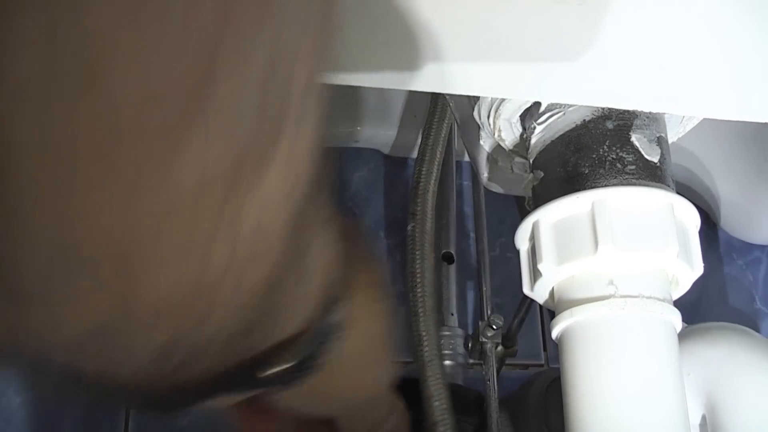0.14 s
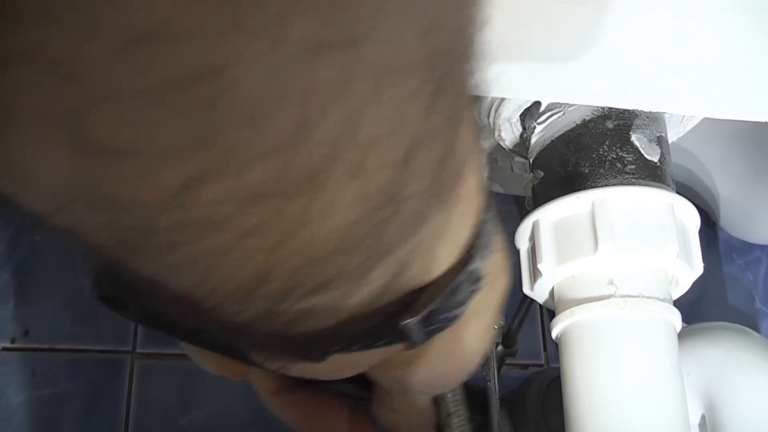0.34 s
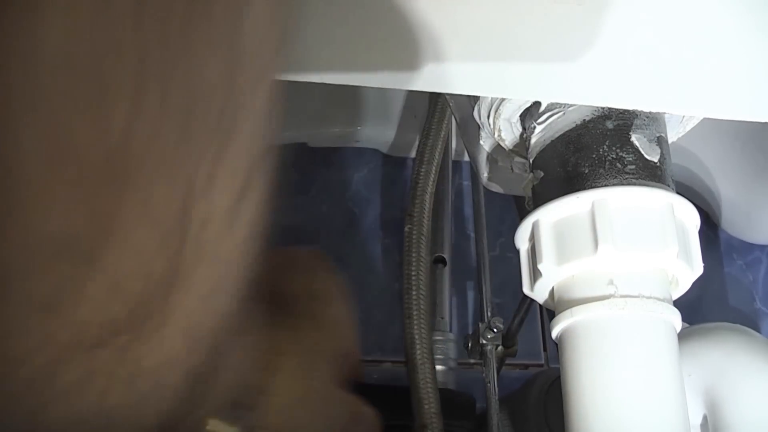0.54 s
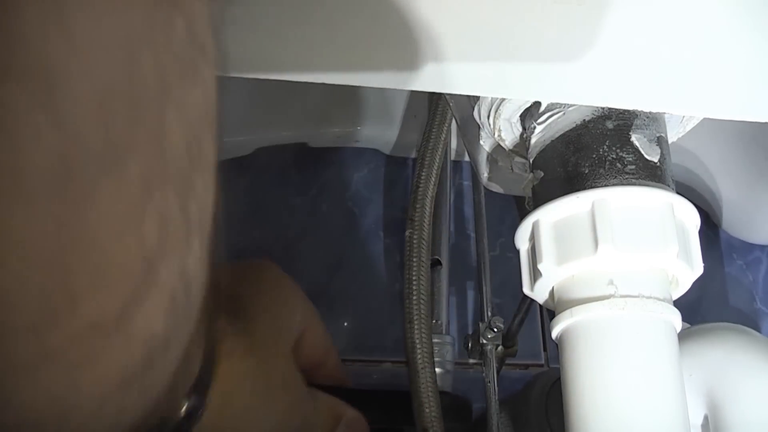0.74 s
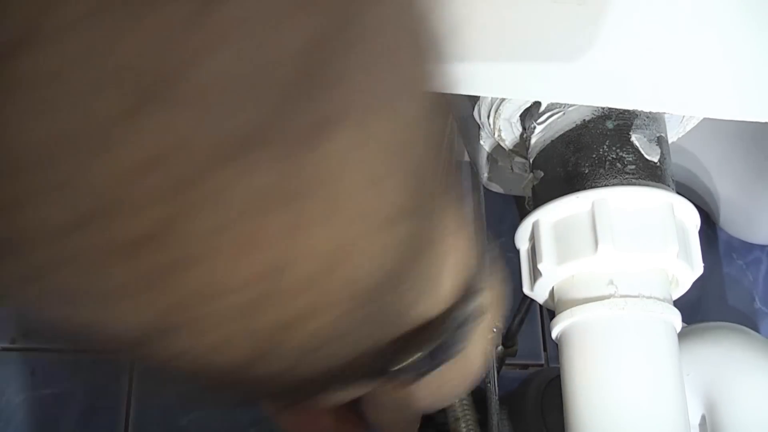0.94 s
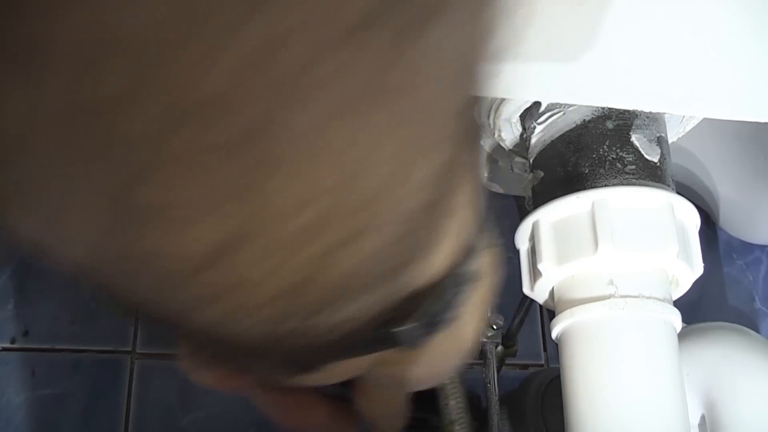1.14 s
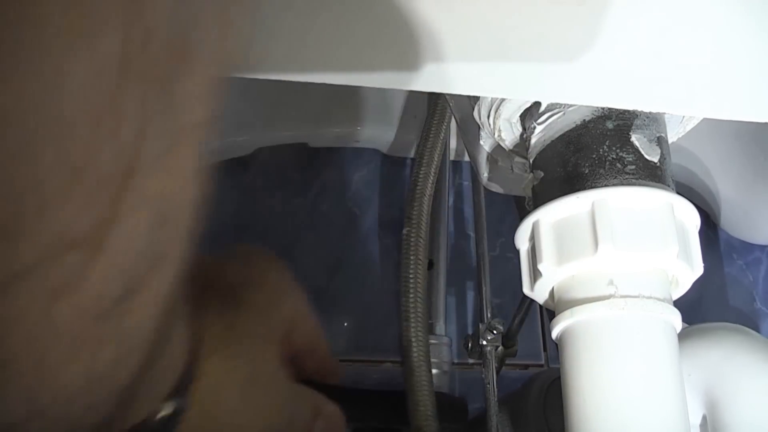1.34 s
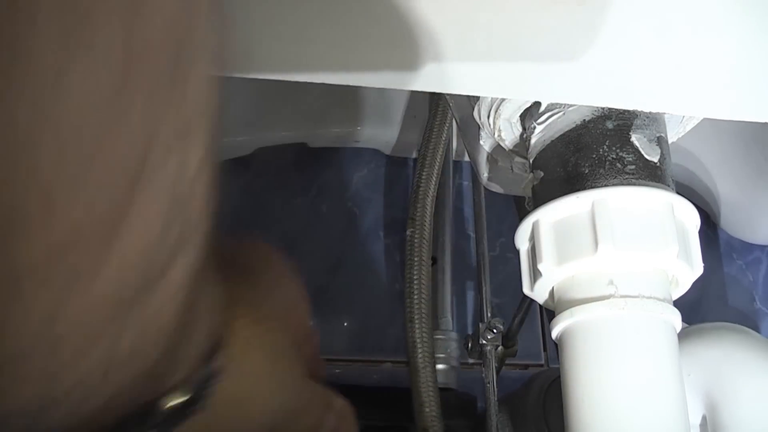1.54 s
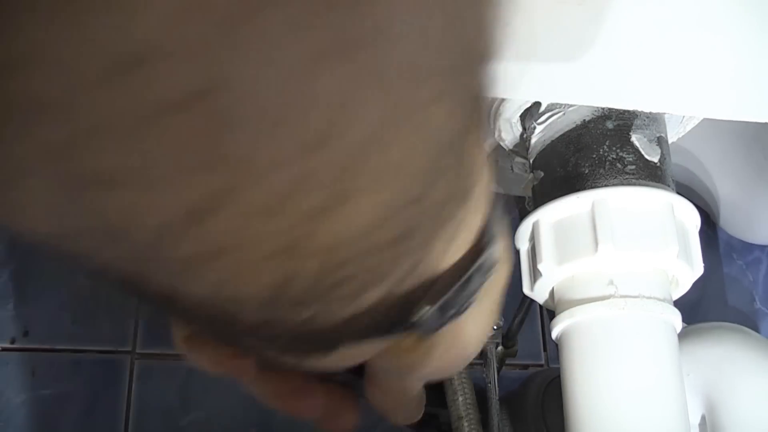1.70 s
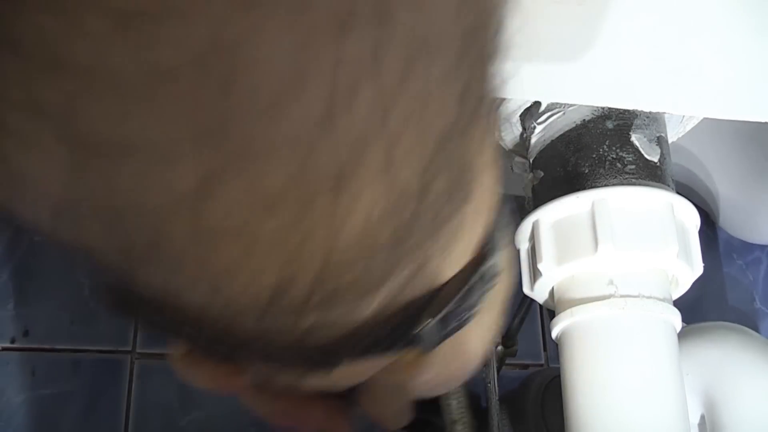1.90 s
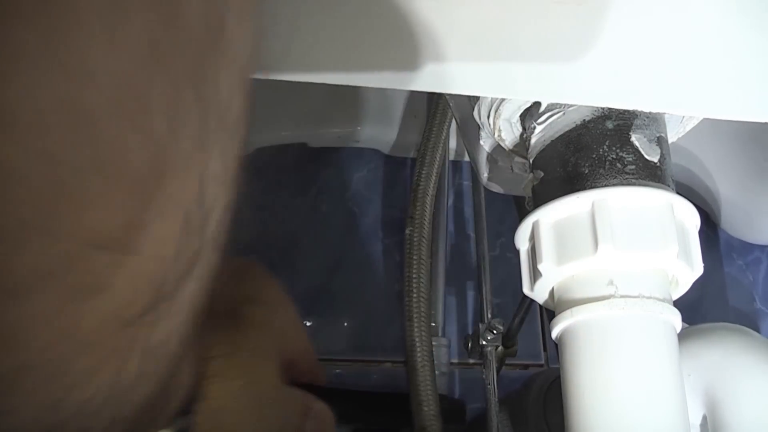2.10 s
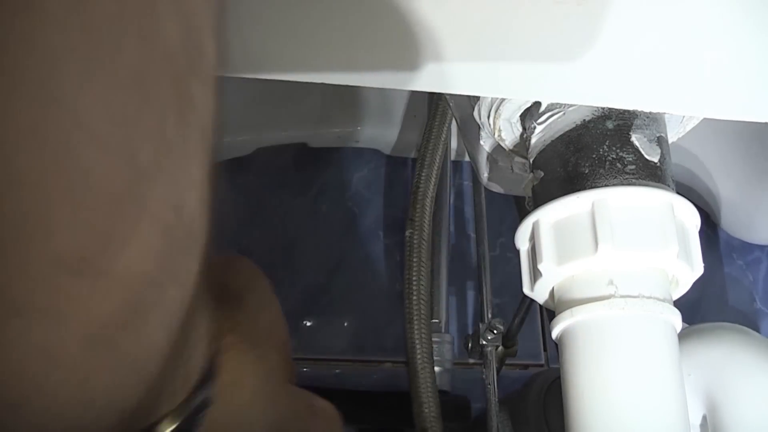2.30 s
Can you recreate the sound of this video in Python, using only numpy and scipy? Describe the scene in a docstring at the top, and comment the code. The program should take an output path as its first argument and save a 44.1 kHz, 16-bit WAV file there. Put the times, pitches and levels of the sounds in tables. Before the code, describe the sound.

A socket ratchet works under a basin, close, in a small echoing tiled room. After faint hum and soft rubbing, bright clicks come at 0.2-0.3 s with a dull hollow knock at 0.27. Bumps and gritty rattles follow. Slower clicks span 0.9-1.1 s, with a brighter knock at 1.06; more rattling at 1.2. Quick clicks at 1.65-1.7, sharp knock at 1.78, bumps, one steel clink at 2.06, then quiet handling.

```python
"""First a quiet room with a faint hum and the low rub of a grip, then an arm's soft brush and dull bumps.
A socket ratchet works back and forth on a nut under a basin in a small tiled room. Bumps are low rings
and dull noise, rattles are gritty noise bursts. In three groups the pawl snaps over a few teeth and
the handle knocks on the basin: noise bursts with ringing sines. Late on, steel clinks on steel once.
Contacts echo off the tiles through decaying bands of noise."""
import sys
import numpy as np
from scipy import signal
from scipy.fft import rfft, irfft, next_fast_len
from scipy.io import wavfile

SR = 44100
rng = np.random.default_rng(int(sys.argv[2]) if len(sys.argv) > 2 else 0)


def store_pcm(level_fs):
    """Save levels as 16-bit WAV."""
    pcm = np.round(np.clip(level_fs, -1, 1) * 32767).astype(np.int16)
    wavfile.write(sys.argv[1], SR, np.atleast_2d(pcm).T)


N = 103635
TIME = np.arange(N) / SR
AGE = np.arange(SR // 2) / SR  # time since a contact (s)


def amp(db):
    """Decibels to gain."""
    return 10 ** (np.asarray(db) / 20)


def at_hz(points, hz):
    """Read a table on a log-frequency axis."""
    f, value = np.transpose(points)
    return np.interp(np.log(hz), np.log(f), value)


def colour(x, spectrum, tilt=0, dull_hz=None):
    """Minimum-phase filter with the given spectrum, tilted in dB per octave and perhaps dulled on top."""
    size = 2 * next_fast_len(len(x))
    hz = np.maximum(np.arange(size // 2 + 1) * SR / size, 10)
    # the tilt pivots at 1 kHz and stops growing below 200 Hz
    level_db = at_hz(spectrum, hz) + tilt * np.log2(np.maximum(hz, 200) / 1000)
    gain = amp(level_db) / np.hypot(1, (40 / hz) ** 2)  # rolls off below 40 Hz
    if dull_hz:
        gain = gain / np.hypot(1, (hz / dull_hz) ** 2)
    # folding the cepstrum makes the filter causal
    cepstrum = irfft(np.log(gain))[:size // 2]
    cepstrum[1:] *= 2
    response = np.exp(rfft(cepstrum, size))
    return irfft(rfft(x, size) * response)[:len(x)]


def unit(x):
    """Scale a hit to the energy of 10 ms at full level."""
    return x * np.sqrt(.01 * SR / np.sum(x ** 2))


def fade(t60, rise=1e-5):
    """Envelope of a contact: quick rise, exponential decay."""
    return (1 - np.exp(-(AGE / rise) ** 2)) * np.exp(-np.log(1000) * AGE / t60)


GRAIN_S = 0.001237


def scatter(t60, rise, grit_db=0):
    """A contact smeared by dense reflections in the cramped space; grit breaks it into grains."""
    grains = np.interp(AGE / GRAIN_S, np.arange(5000), rng.standard_normal(5000))
    return unit(rng.standard_normal(len(AGE)) * amp(grit_db * grains) * fade(t60, rise))


RING_BLUR_HZ = 15.4  # line width of a ring at 1 kHz, smeared by the moving hand


def ring(modes, rise=1e-5, spread_db=0):
    """Decaying, slightly wavering sines of a struck body; their strengths vary by spread_db."""
    out = 0
    for k, (hz, db, t60) in enumerate(modes):
        step = np.sqrt(2 * np.pi * RING_BLUR_HZ * hz / 1000 / SR)
        waver = np.cumsum(rng.standard_normal(len(AGE))) * step
        strength = (-1) ** k * amp(db + spread_db * rng.standard_normal())
        out = out + strength * np.sin(2 * np.pi * hz * AGE + waver) * fade(t60, rise)
    return unit(out)


def noise(spectrum):
    """Steady coloured noise of rms 1."""
    x = colour(rng.standard_normal(N + len(AGE)), spectrum)[-N:]  # drops the filter's start-up
    return x / x.std()


def add(out, s, x):
    """Mix a sound in at its time."""
    start = int(s * SR)
    out[start:start + len(x)] += x[:max(N - start, 0)]


FLOOR_DB, HUM_TRIM_DB = -60, -4.5
# spectrum of the quiet room: [f/Hz, level/dB]
FLOOR_SPECTRUM = [(25, -5), (70, 3.5), (110, -4), (200, -10.5), (340, -6.5), (560, -20), (1000, -33),
                  (2000, -19.5), (3000, -22), (8000, -26.5), (16000, -40)]
# steady tones of the room: [f/Hz, level/dB before the hum trim]
HUM_TONES = [(113.0, -62), (344.5, -58)]


def background():
    """Quiet coloured room noise with a faint hum of steady sines."""
    hum = 0
    for hz, db in HUM_TONES:
        hum = hum + amp(db) * np.sqrt(2) * np.sin(2 * np.pi * (hz * TIME + rng.random()))
    return amp(FLOOR_DB) * noise(FLOOR_SPECTRUM) + amp(HUM_TRIM_DB) * hum


GRIP_ROUGH_DB, GRIP_SLIP_S = 3, .012  # the grip sticks and slips
# the grip rubs on the tool, a moving level: [t/s, level/dB]
GRIP_LEVELS = [(0, -61), (.1, -59.5), (.16, -40.5), (.36, -41), (.5, -61), (.57, -52), (.8, -67.5),
               (.88, -40.5), (1.25, -41.5), (1.34, -46.5), (1.44, -47.5), (1.56, -57.5), (1.63, -41),
               (1.8, -42.5), (1.94, -53), (2.1, -36), (2.22, -65), (2.35, -48.5)]
# spectrum of the rub: [f/Hz, level/dB]
RUB_SPECTRUM = [(50, -13), (80, -7), (106, 3.5), (140, 2.5), (400, -0.5), (800, -7.5), (2000, -13),
                (3500, -22.5), (9000, -38), (16000, -51)]
# the arm brushes past: [t/s at the peak, level/dB, half length/s]
ARM_BRUSHES = [(0.09, -53, 0.033), (0.456, -42, 0.016), (0.612, -55, 0.049), (0.964, -49.5, 0.091),
               (1.209, -53, 0.048), (1.429, -51, 0.052), (1.555, -56, 0.015), (2.36, -52.5, 0.046)]
# spectrum of the brushing hiss: [f/Hz, level/dB]
BRUSH_SPECTRUM = [(300, 7), (2000, 6.5), (5000, 5.5), (9000, 3), (12000, -3.5), (16000, -11)]


def handling():
    """Soft swells of hiss from the moving arm, and the uneven low rub of the grip."""
    swell = sum(amp(db) * np.exp(-((TIME - s) / half) ** 2) for s, db, half in ARM_BRUSHES)
    slips = np.interp(TIME / GRIP_SLIP_S, np.arange(N), rng.standard_normal(N))
    grip_db = np.interp(TIME, *np.transpose(GRIP_LEVELS)) + GRIP_ROUGH_DB * slips
    return swell * noise(BRUSH_SPECTRUM) + amp(grip_db) * noise(RUB_SPECTRUM)


BUMP_RISE_S, BUMP_T60_S, BUMP_TONE_DB, BUMP_SCATTER_DB = 0.0012, 0.11, -1.5, -3.5
# hand and handle bump the fittings: [t/s, level/dB, pitch f/Hz, scatter tilt/dB per octave, boom level/dB]
FITTING_BUMPS = [(0.118, -39.5, 284, 2, -10), (0.153, -54.5, 170, 4, 19), (0.239, -32.5, 436, 6, -22),
                 (.277, -33.5, 258, -3, -35), (.301, -33, 243, 1, -4.5), (0.4072, -32, 816, -1.5, -8),
                 (.415, -27.5, 432, -0.5, -18), (.465, -29.5, 401, -0.5, -5), (0.477, -28, 383.6, -3, -10),
                 (.634, -37, 362, 2, 1), (.649, -38, 223, -6, 2.5), (.862, -31.5, 392, 1.5, -7),
                 (.954, -28.5, 405.5, -0.5, -30), (1.003, -35.5, 398, 0, -8), (1.195, -24, 444, 2, -37),
                 (1.207, -26, 389.5, 1, -12), (1.221, -27, 396, 0.5, -1), (1.269, -38.5, 124, -5, -6.5),
                 (1.395, -26.5, 404, -2, -11.5), (1.408, -34.5, 233, -1.5, -3.5), (1.61, -41, 350, 3, -6),
                 (1.643, -38, 438, 10, -3), (1.699, -29.5, 415, 2, -33), (1.738, -33, 450, 0.5, -5),
                 (1.9695, -25, 399, 0, -22), (1.983, -28.5, 269, -4.5, -8), (2.008, -28, 495, 1, -9),
                 (2.023, -30, 470, -8, -16), (2.07, -26.5, 237, -1.5, -4.5), (2.287, -36, 223, 0.5, -12)]
# spectrum of the dull scatter: [f/Hz, level/dB]
BUMP_SPECTRUM = [(50, -26.5), (130, 6), (250, -1), (450, -1), (700, -6), (1100, -20), (2000, -14.5),
                 (4000, -40.5), (16000, -73)]
# air under the basin: [f/Hz, level/dB, t60/s]
HOLLOW_MODES = [(104.2, -4, .22), (130.4, -10.5, 0.093), (162.5, -3.5, 0.11)]


def bumps():
    """Soft contacts: a short low ring, dull scatter and the boom of the hollow."""
    out = np.zeros(N)
    for s, db, hz, tilt, boom_db in FITTING_BUMPS:
        tone = amp(BUMP_TONE_DB) * ring([(hz, 0, BUMP_T60_S)], BUMP_RISE_S)
        dull = colour(scatter(BUMP_T60_S, BUMP_RISE_S), BUMP_SPECTRUM, tilt)
        thud = amp(BUMP_SCATTER_DB) * unit(dull)
        boom = amp(boom_db) * ring(HOLLOW_MODES, rise=0.0068)
        add(out, s, amp(db) * (tone + thud + boom))
    return out


ROOM_BUILD_S = 0.0062
# how long the tiles ring on: [f/Hz, t60/s]
ROOM_DECAY = [(100, 0.58), (500, 0.36), (2000, 0.44), (5000, 0.23), (14000, 0.44)]
# echo against direct sound: [f/Hz, level/dB]
ROOM_SPECTRUM = [(100, -8), (400, -11), (1000, -10.5), (2000, -10.5), (4000, -17), (8000, -17.5),
                 (15000, -23.5)]


def room(x):
    """Echo of the tiled room: eight bands of noise about an octave wide, each dying at its own rate."""
    tail, edges = 0, np.geomspace(60, 18000, 9)
    for low, high in zip(edges, edges[1:]):
        envelope = fade(at_hz(ROOM_DECAY, np.sqrt(low * high)), ROOM_BUILD_S)
        band_pass = signal.butter(2, [low, high], "band", fs=SR, output="sos")
        band = signal.sosfilt(band_pass, rng.standard_normal(len(AGE)) * envelope)
        tail = tail + band * np.sqrt(2 * (high - low) / SR / np.sum(band ** 2))  # energy by bandwidth
    return signal.fftconvolve(x, colour(tail, ROOM_SPECTRUM))[:N]


WALL_ECHO_DB = -7.5
# first echoes off basin, pipes and tiles: [shortest delay/s, longest delay/s]
WALL_DELAYS = (.0004, .0035)


def near_walls(x, count=4):
    """A few close echoes, drawn anew for each contact, give it its own hollow colour."""
    out = x.copy()
    delays = np.interp(rng.random(count), [0, 1], WALL_DELAYS)
    for lag in np.maximum(1, SR * delays).astype(int):
        out[lag:] += amp(WALL_ECHO_DB) * rng.choice([-1, 1]) * x[:-lag]
    return unit(out)


RATTLE_RISE_S, RATTLE_GRIT_DB = 0.00052, 4
# the socket shifts in its play: [t/s, level/dB, tilt/dB per octave, t60/s]
SOCKET_RATTLES = [(.1405, -43, -0.5, 0.057), (.1645, -45.5, 3.5, 0.035), (.2685, -25.5, -1.5, 0.032),
                  (.408, -35, -2.5, .1), (.422, -33.5, -3, 0.046), (.457, -36.5, 6, 0.055),
                  (.4645, -32.5, -4.5, 0.055), (.476, -38, -2.5, 0.044), (.622, -44, 3.5, 0.048),
                  (.637, -48, 10, 0.031), (.797, -54, -2, 0.13), (.8645, -32, 1.5, 0.028),
                  (.872, -33, 4, 0.027), (1.169, -35.5, 0.5, .09), (1.185, -28.5, -3.5, 0.11),
                  (1.1935, -24.5, -3.5, 0.051), (1.207, -35, -9, .04), (1.216, -32.5, -2.5, 0.073),
                  (1.297, -43.5, -2.5, .09), (1.394, -46.5, 1, 0.073), (1.5955, -31.5, 4.5, 0.054),
                  (1.6015, -37.5, 0, 0.059), (1.807, -38, 1.5, .09), (1.821, -37, -.5, .06),
                  (1.970, -35.5, -2.5, 0.066), (1.983, -38.5, 1.5, .06), (2.0045, -30, 0.5, 0.076),
                  (2.0215, -26, -4.5, 0.068), (2.075, -36.5, 0.5, 0.11), (2.2845, -45, -5, 0.14)]
# spectrum of the loose socket: [f/Hz, level/dB]
RATTLE_SPECTRUM = [(200, -14.5), (750, 9), (1100, 0.5), (1310, 2.5), (1600, 2.5), (2050, 2.5), (2700, -5),
                   (3700, 0.5), (4800, -5), (6000, -7.5), (9000, -12), (11000, -23), (16000, -37)]


def rattles():
    """Loose, gritty contacts of the socket on the nut: grainy bursts of coloured noise."""
    out = np.zeros(N)
    for s, db, tilt, t60 in SOCKET_RATTLES:
        burst = scatter(t60, RATTLE_RISE_S, RATTLE_GRIT_DB)
        add(out, s, amp(db) * near_walls(colour(burst, RATTLE_SPECTRUM, tilt)))
    return out


CLICK_RISE_S, CLICK_T60_S, CLICK_RING_T60_S = 0.00074, 0.039, .05
HEAD_MODES_DB, HEAD_SPREAD_DB = -7, 9
# the pawl drops over a tooth: [t/s, level/dB, tilt/dB per octave, strongest ring f/Hz, its level/dB]
PAWL_CLICKS = [(0.1997, -27.5, 1.5, 8800, -9), (.2303, -28, -0.5, 4230, -7), (0.2987, -29, -4.5, 6770, -4),
               (0.9151, -26, -2.5, 5120, -9), (0.9689, -25.5, -1, 2480, -7), (1.011, -26.5, -2, 4290, -5.5),
               (1.121, -26, -3.5, 3576, -1.5), (1.647, -25, -1.5, 4210, -12),
               (1.6719, -27.5, -1, 4340, -13), (1.7045, -27.5, .5, 5710, -12)]
# spectrum of the steel head: [f/Hz, level/dB]
HEAD_SPECTRUM = [(200, -21.5), (1000, -19.5), (1700, -3.5), (2300, -3), (2800, 0.5), (4300, 5.5), (6000, 1),
                 (7600, 1), (9000, 2.5), (11000, -5.5), (15000, -13.5), (16500, -21)]
# small resonances of the head, struck differently by each tooth: [f/Hz, level/dB, t60/s]
HEAD_RESONANCES = [(2263, -6, 0.075), (3304, -18, 0.034), (4260, -0.5, 0.048), (5720, 4, 0.077),
                   (6000, 4.5, 0.043), (7110, -12, 0.078), (8060, -2, 0.029), (9020, -8, 0.051),
                   (10140, -4.5, 0.035), (13400, -11, .04), (14700, -11, .04)]


def pawl():
    """Each tooth gives a short bright snap that rings the head, with one further resonance of its own."""
    out = np.zeros(N)
    for s, db, tilt, hz, ring_db in PAWL_CLICKS:
        burst = scatter(CLICK_T60_S, CLICK_RISE_S, grit_db=1.0)
        snap = near_walls(colour(burst, HEAD_SPECTRUM, tilt))
        head = amp(HEAD_MODES_DB) * ring(HEAD_RESONANCES, CLICK_RISE_S, HEAD_SPREAD_DB)
        strongest = amp(ring_db) * ring([(hz, 0, CLICK_RING_T60_S)], CLICK_RISE_S)
        add(out, s, amp(db) * (snap + head + strongest))
    return out


KNOCK_T60_S, CRACK_DB = 0.04, -4
# the handle hits the basin: [t/s, level/dB, tilt/dB per octave, ring level/dB, duller above f/Hz]
HANDLE_KNOCKS = [(0.2684, -18, -3.5, 1, 1320), (1.0633, -19, 2, -1.5, 3720), (1.7752, -17, 2.5, -6, 4850)]
# spectrum of the blow: [f/Hz, level/dB]
KNOCK_SPECTRUM = [(100, -25), (250, -14.5), (450, -2), (750, 3), (1090, 4), (1310, -8), (1600, 1),
                  (1800, -7.5), (2020, -1), (2500, -7), (3100, -2), (5000, -11.5), (9000, -21),
                  (16000, -41)]
# resonances of the basin: [f/Hz, level/dB, t60/s]
BASIN_MODES = [(247.6, -4, 0.29), (309.4, -9, 0.47), (381.7, -4, 0.43), (455.7, 0, 0.25), (560, 0.5, 0.12),
               (663.6, 2, 0.18), (760, 1, 0.13), (939, -9.5, 0.068), (1032, -1.5, 0.041), (1114, 2, 0.15),
               (1173, -7, .12), (1478, -9.5, 0.21), (1587, -3, 0.21), (1644, -4, 0.12), (2008, 1, .11),
               (3100, -16, .06), (3514, -1, .06)]


def knocks():
    """A hard crack, its close reflections and the ring of the basin, each blow dulled on its own."""
    out, flat = np.zeros(N), [(1, 0), (SR, 0)]
    for s, db, tilt, ring_db, dull_hz in HANDLE_KNOCKS:
        crack = amp(CRACK_DB) * unit(1.0 * (AGE == 0))  # a single-sample impulse
        blow = crack + scatter(KNOCK_T60_S, 0.00062)
        hit = unit(colour(blow, KNOCK_SPECTRUM, tilt, dull_hz))
        basin = unit(colour(ring(BASIN_MODES), flat, tilt, dull_hz))
        add(out, s, amp(db) * (hit + amp(ring_db) * basin))
    return out


CLINK_S, CLINK_DB, CLINK_TICK_DB = 2.0632, -24, -28
CLINK_TILT, CLINK_DULL_HZ = -4.2, 9000  # tilt in dB per octave
# steel struck by steel: [f/Hz, level/dB, t60/s]
STEEL_MODES = [(2810, -13.5, .025), (3200, 2.5, 0.013), (3640, -1.5, 0.026), (4050, -11, 0.12),
               (4474, -27, 0.043), (8030, -6, .02), (8280, -5, 0.029), (8900, -17, 0.049)]


def clink():
    """Steel strikes steel once: a sharp noise tick and the short ring of the steel."""
    out = np.zeros(N)
    tick = unit(colour(scatter(t60=0.03, rise=.0003), HEAD_SPECTRUM, CLINK_TILT, CLINK_DULL_HZ))
    steel = ring(STEEL_MODES, rise=0.00024)
    add(out, CLINK_S, amp(CLINK_DB) * steel + amp(CLINK_TICK_DB) * tick)
    return out


CLINK_ROOM_DB = -1  # the clink's send into the room


def scene():
    """Tool and hand close by, the room behind them."""
    contacts = pawl() + knocks() + rattles() + bumps()
    steel = clink()
    echo = room(contacts + amp(CLINK_ROOM_DB) * steel)
    return (contacts + steel + echo + handling() + background())[None]


LOW_CUT_HZ, CEILING_DB, CUTOFF_HZ = 70, -8, 17000


def record(dry):
    """The deep bass is cut, the loudest peaks are rounded and the top is cut."""
    thin = signal.sosfilt(signal.butter(2, LOW_CUT_HZ, "high", fs=SR, output="sos"), dry)
    rounded = amp(CEILING_DB) * np.tanh(thin / amp(CEILING_DB))
    return signal.sosfilt(signal.cheby2(14, 70, CUTOFF_HZ, fs=SR, output="sos"), rounded)


dry = scene()
out = record(dry)
store_pcm(out)
```